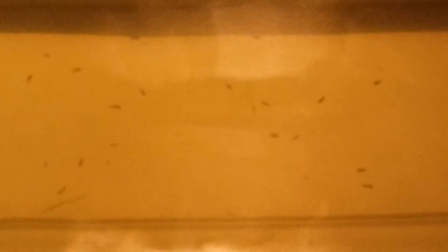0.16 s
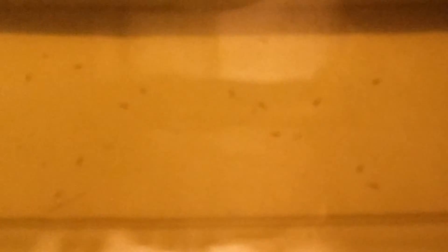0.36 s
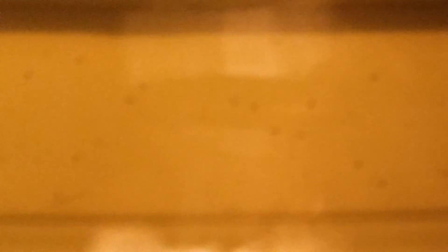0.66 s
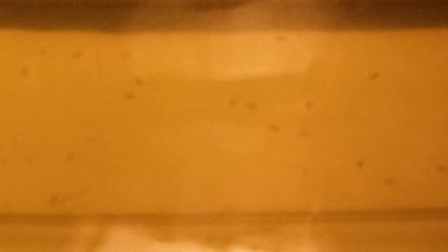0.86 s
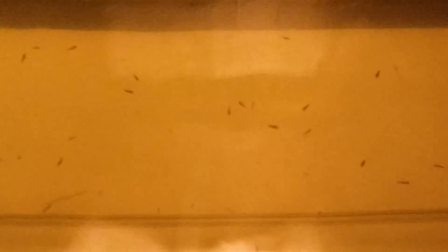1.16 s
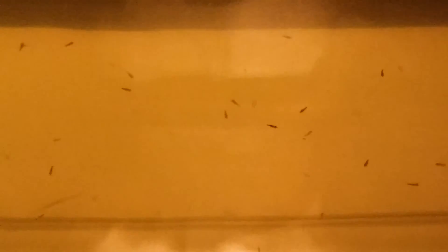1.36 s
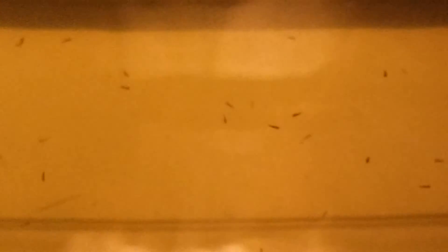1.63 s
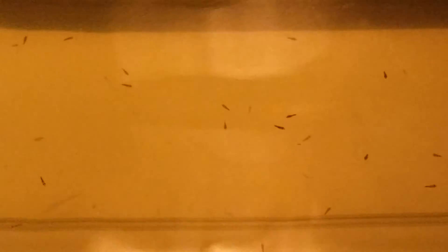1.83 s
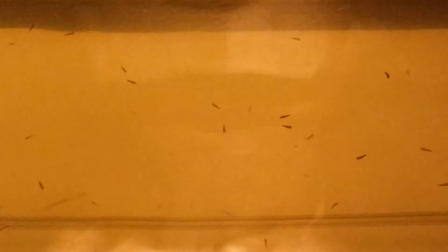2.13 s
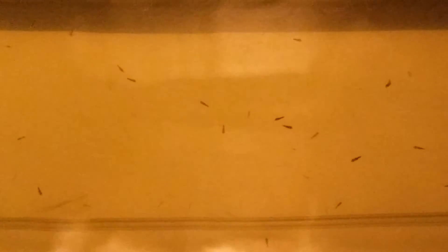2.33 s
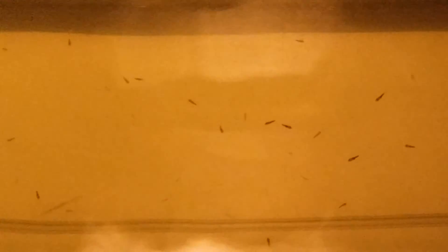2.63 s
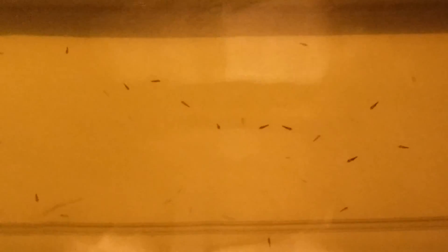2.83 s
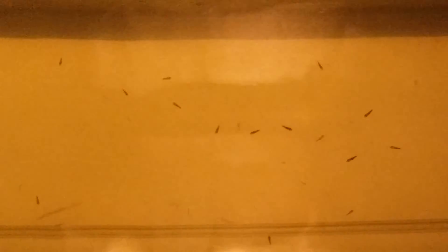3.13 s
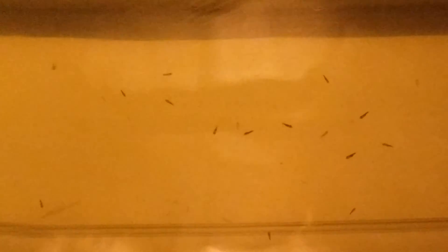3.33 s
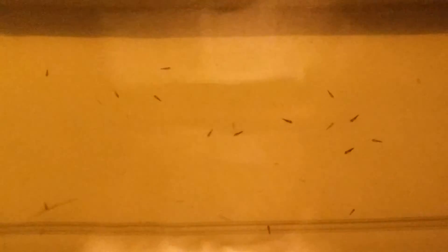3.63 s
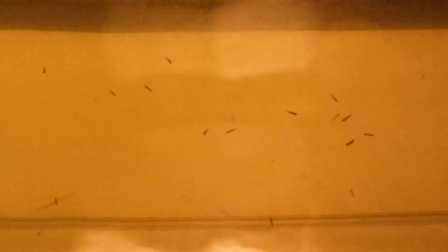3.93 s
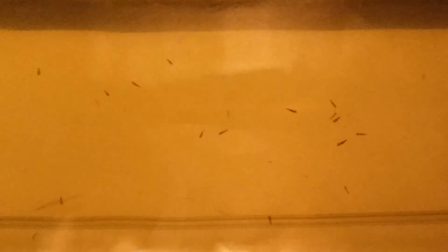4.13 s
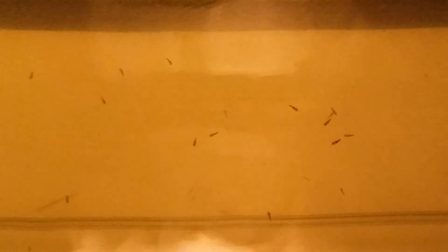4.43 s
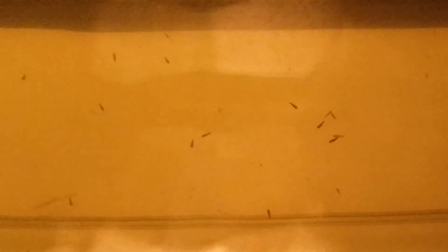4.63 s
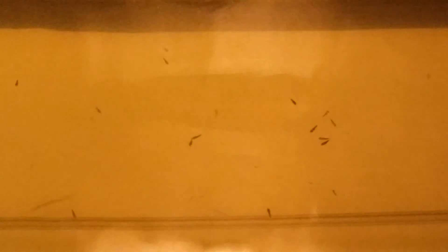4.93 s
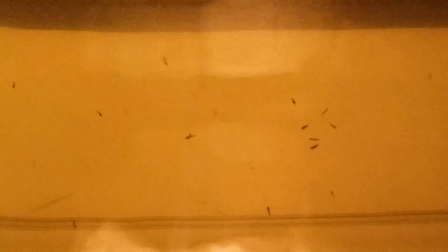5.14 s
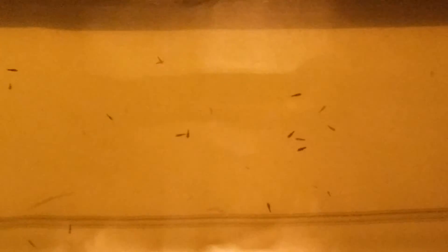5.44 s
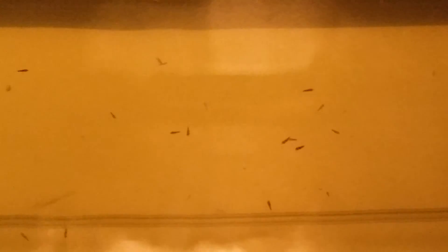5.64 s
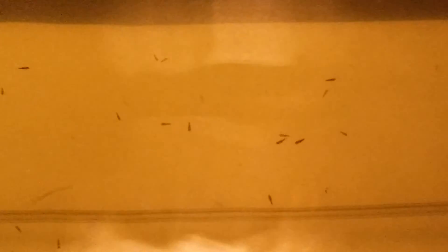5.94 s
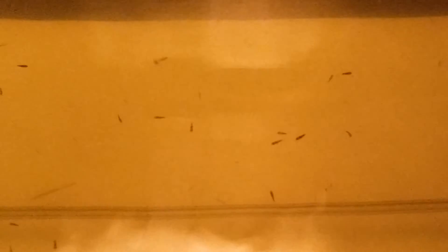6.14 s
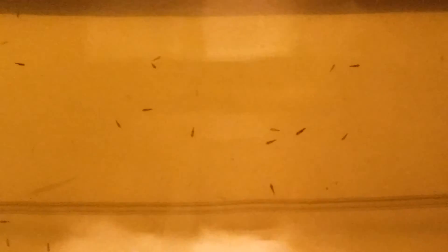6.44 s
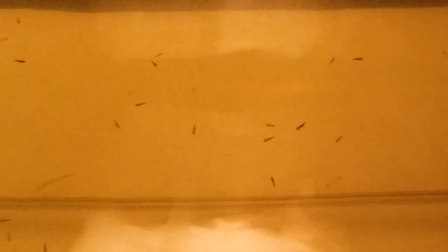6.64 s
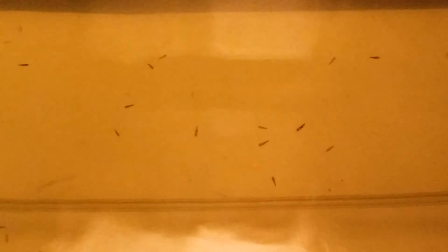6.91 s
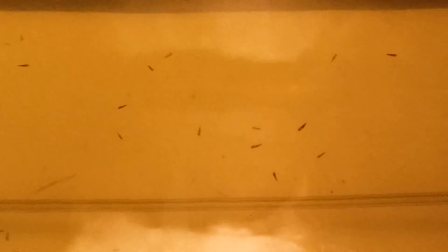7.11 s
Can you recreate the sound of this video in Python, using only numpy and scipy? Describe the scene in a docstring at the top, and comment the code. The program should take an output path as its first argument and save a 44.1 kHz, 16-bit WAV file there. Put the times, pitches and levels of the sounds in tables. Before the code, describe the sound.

An aquarium pump hums low and steadily with a fluttering, wavering drone, soft rushing water and hiss, and occasional tiny bubble ticks.

```python
"""An aquarium pump hums at multiples of the mains frequency; the level around 120 Hz wavers irregularly.
Resonances of the housing throb with the impeller, over steadier resonances of the pump and the tank.
Noise shaped in frequency makes the rumble, the rush of water and the hiss at the surface.
Bubbles burst there as short decaying rings with dense reflections. The sound fades in by two steps."""
import sys
import numpy as np
from scipy import signal
from scipy.fft import rfft, irfft
from scipy.io import wavfile
from scipy.ndimage import uniform_filter1d

SR = 44100
rng = np.random.default_rng(int(sys.argv[2]) if len(sys.argv) > 2 else 0)


def generate_wav(signal):
    """Clip the signal to [-1, 1] and save it as 16-bit WAV at the path in sys.argv[1]."""
    frames = np.transpose(np.atleast_2d(signal))
    scaled = np.clip(frames, -1, 1) * 32767
    pcm = np.round(scaled).astype(np.int16)
    wavfile.write(sys.argv[1], SR, pcm)


N = 320607
TIME = np.arange(N) / SR  # s
FREQS = np.fft.rfftfreq(N, 1 / SR)  # Hz

MAINS_HZ = 60.022
THROB_HZ, THROB_CREST_S = 15.545, 0.0066  # rate of the impeller's throb; time of one crest
BAND_EDGE_HZ = 14850
FADE_START_S, FADE_RISE_S, FADE_HOLD_DB = 0.042, 0.19, -5.5  # rises from silence, holds below full level
FULL_START_S, FULL_RISE_S = 0.62, 0.27  # then rises the rest of the way
HUM_RISE_S = 0.24  # the hum's own additional ramp


def from_db(db):
    """Amplitude ratio: 20 dB is a factor of ten."""
    return 10 ** (np.asarray(db) / 20)


def unit(x):
    """Normalization by root mean square: scales each channel to rms 1."""
    return x / np.sqrt(np.mean(x ** 2, axis=-1, keepdims=True) + 1e-20)


def ramp(start_s, rise_s):
    """Linear onset: rises evenly from 0 to 1 and stays there."""
    return np.clip((TIME - start_s) / rise_s, 0, 1)


def spectrum(rows):
    """Spectral envelope: each table column is joined by straight lines over log frequency."""
    hz, *columns = np.transpose(rows)
    log_freqs = np.log(FREQS + 1)
    return np.array([np.interp(log_freqs, np.log(hz + 1), column) for column in columns])


def drift(rate_hz):
    """Random modulation: Gaussian low-pass noise of zero mean and rms 1."""
    lowpass = np.exp(-(FREQS / rate_hz) ** 2) * (FREQS > 0)
    return unit(irfft(rfft(rng.standard_normal(N)) * lowpass, N))


def panned(sound, pan_db):
    """Level difference between channels: positive values favor the left."""
    return sound * from_db([[pan_db / 2], [-pan_db / 2]])


def add(mix, start_s, sound):
    """Superposition: a stereo sound is summed into the mix at its start time."""
    part = mix[:, max(round(start_s * SR), 0):][:, :sound.shape[1]]
    part += sound[:, :part.shape[1]]


# likeness of the two channels: (frequency [Hz], correlation [-1 to 1])
CHANNEL_CORRELATION = [(130, 0.92), (250, 0.95), (330, 0.82), (450, -0.11), (700, 0.92), (1000, 0.27),
                       (1600, -0.46), (2500, 0.34), (3300, -0.11), (6000, -0.023)]


def noise(gain):
    """Interchannel correlation: stereo noise of a given amplitude per root Hz, alike by frequency."""
    first, second = rfft(rng.standard_normal((2, N)))
    same = np.clip(spectrum(CHANNEL_CORRELATION)[0], -1, 1)
    right = same * first + np.sqrt(1 - same ** 2) * second
    return irfft(np.array([first, right]) * gain, N) * np.sqrt(SR / 2)


def ringing(hz, width):
    """Resonance: broadband turbulence excites a narrow band about one frequency."""
    return noise(1 / (1 + ((FREQS - hz) / width * 1.48) ** 2))


# Spectral densities before the flow modulates them.
# rumble of tank and stand: (frequency [Hz], level [dB per Hz])
RUMBLE_SPECTRUM = [(30, -87), (46, -73.5), (64, -58.5), (72, -59.5), (92, -57.5), (105, -61), (115, -48.5),
                   (128, -55), (146, -56), (164, -58.5), (185, -56), (208, -56.5), (240, -54.5),
                   (290, -54.5), (325, -59), (350, -67.5), (560, -112)]
# rush of water in the pump: (frequency [Hz], left level [dB per Hz], right level [dB per Hz])
RUSH_SPECTRUM = [(150, -105, -105), (329, -68.5, -81.5), (422, -63.5, -62), (540, -74.5, -71),
                 (634, -61, -64.5), (699, -64.5, -67.5), (747, -67.5, -70.5), (850, -71.5, -77),
                 (946, -72, -70), (1120, -73.5, -70), (1490, -72.5, -73), (1555, -72, -70),
                 (2290, -75.5, -70.5), (2340, -73.5, -67.5), (3290, -80, -72.5), (4500, -83.5, -86),
                 (9000, -115, -115)]
# hiss at the surface: (frequency [Hz], left level [dB per Hz], right level [dB per Hz])
HISS_SPECTRUM = [(1500, -115, -115), (2780, -79.5, -89), (4170, -76, -73), (4600, -75, -82),
                 (5240, -74.5, -76.5), (6820, -73, -83.5), (7600, -81.5, -76.5), (8420, -80.5, -78),
                 (10660, -94.5, -89.5), (10580, -79, -94.5), (12700, -117, -86), (16600, -99, -90.5)]


def water(rumble_db=-0.55, rush_db=0.5, hiss_db=0.82, churn_hz=16):
    """Flow noise: one uneven flow lifts rush and hiss together while the rumble sinks."""
    flow = drift(churn_hz)
    layers = [(RUMBLE_SPECTRUM, rumble_db), (RUSH_SPECTRUM, rush_db), (HISS_SPECTRUM, hiss_db)]
    out = np.zeros((2, N))
    for rows, depth_db in layers:
        out += noise(from_db(spectrum(rows))) * from_db(depth_db * flow)
    return out


def bubble(db, hz, pan_db, cycles, wet, echo_s, snap, crack=0.14, crack_s=0.00036):
    """Cavity resonance: the film cracks, the cavity rings, and glass, lid and water reflect it densely."""
    t = np.arange(SR // 8) / SR
    age = t * hz / cycles
    envelope = age * np.exp(1 - age)  # peaks at 1 after the given cycles
    # the ragged tear of the film spreads the ring over a wider band
    tear = unit(uniform_filter1d(rng.standard_normal(len(t)), size=8))
    phase = 2 * np.pi * hz * t
    ring = envelope * (np.sin(phase) + snap * tear * np.cos(phase))
    crack_noise = unit(np.diff(rng.standard_normal(len(t) + 1)))
    burst = ring + crack * crack_noise * np.exp(-t / crack_s)
    # the reflections build up over about 0.74 ms, then decay
    echo_envelope = np.exp(-t / echo_s) * (1 - np.exp(-t / 0.00074))
    echoes = unit(rng.standard_normal((2, len(t))) * echo_envelope) / np.sqrt(len(t))
    reflected = signal.fftconvolve(burst[None], echoes, axes=1)[:, :len(t)]
    return panned(from_db(db) * (burst + wet * reflected), pan_db)


# bubbles bursting at the surface: (time [s], peak level of the ring's envelope before panning [dB],
# pitch [Hz], left-right difference [dB], time until the ring peaks [cycles])
BUBBLE_BURSTS = [(1.1548, -31, 14300, -11, 3.5), (1.3504, -30, 6800, 5, 2.5), (1.734, -19, 13000, -10, 3.0),
                 (1.735, -21, 12400, -6, 3.6), (1.735, -22, 14400, -10, 3.3), (1.739, -29.5, 6250, 8, 3.6),
                 (1.9235, -32, 14400, -14, 4.2), (2.0284, -32, 5760, 7, 2.3),
                 (2.2847, -26.5, 14100, -13, 4.2), (2.4937, -27, 6760, 10, 2.2),
                 (2.6675, -29, 6790, 5, 2.3), (3.262, -23, 6300, 9, 1.6), (3.2645, -30, 7600, 6, 1.6),
                 (3.2924, -28, 13900, -11.5, 3.4), (3.785, -42, 14000, -14, 3.3),
                 (4.0006, -34, 5900, 5, 2.3), (4.1769, -31.5, 13800, -9.5, 3.2),
                 (4.3294, -30, 5240, 2.5, 2.1), (4.8132, -37, 14000, -9, 3.3),
                 (5.333, -36, 13800, -11, 3.3), (5.581, -28, 6050, 5, 2.3), (5.7206, -40, 14000, -12, 3.3),
                 (6.2564, -38, 14000, -14, 3.3), (6.572, -27, 6750, 7.5, 1.7), (6.595, -23, 5060, 6, 4),
                 (6.595, -25, 6200, 9, 1.6), (6.8249, -33, 14300, -8, 3.3)]


def bubbles(fizz_db=-46, fizz_pan_db=5, prickle_db=-51, prickle_pan_db=-12, spread_db=6, count=90):
    """Bubble acoustics: distinct bursts over random faint ones, the tiny ones pitched higher."""
    out = np.zeros((2, N))
    for start_s, db, hz, pan_db, cycles in BUBBLE_BURSTS:
        add(out, start_s, bubble(db, hz, pan_db, cycles, wet=1.0, echo_s=0.011, snap=0.29))
    # fizz of larger bubbles
    for when, pitch, strength in rng.random((count, 3)):
        db, hz = fizz_db + spread_db * strength ** 2, 4800 + 3700 * pitch
        add(out, when * N / SR, bubble(db, hz, fizz_pan_db, cycles=3.8, wet=2.5, echo_s=0.011, snap=0.51))
    # prickle of tiny bubbles
    for when, pitch, strength in rng.random((count // 2, 3)):
        db, hz = prickle_db + spread_db * strength ** 2, 13000 + 1600 * pitch
        add(out, when * N / SR, bubble(db, hz, prickle_pan_db, cycles=3.6, wet=1.3, echo_s=0.012, snap=0.88))
    return out


# low resonances of the tank: (frequency [Hz], width setting [Hz], level [dB rms])
TANK_MODES = [(97, 3, -47.5), (144.9, 2.1, -43), (325, 3, -49)]


def tank():
    """Modal resonance: the tank and its stand boom at a few low pitches."""
    return sum(unit(ringing(hz, width)) * from_db(db) for hz, width, db in TANK_MODES)


# high resonances of the pump, levels before the common lift:
# (frequency [Hz], width setting [Hz], left level [dB rms], right level [dB rms])
PUMP_MODES = [(1925, 16, -59, -62), (2432, 9, -60, -55), (2461, 10, -55, -54), (2505, 7, -60, -61),
              (2546, 6, -58, -58), (2570, 7, -60, -54), (2634, 10, -54, -53), (2700, 10, -59, -61),
              (2811, 18, -57, -50), (2889, 6, -64, -58), (2947, 10, -64, -57), (3104, 12, -63, -54),
              (3165, 12, -66, -60), (4067, 25, -60, -64), (4150, 30, -61, -66), (5702, 40, -60, -65)]


def buzz(lift_db=1.1):
    """Narrow-band resonance: stiff parts of the pump sound as a cluster of thin, wavering strands."""
    out = np.zeros((2, N))
    for hz, width, left_db, right_db in PUMP_MODES:
        out += unit(ringing(hz, width)) * from_db([[left_db], [right_db]])
    return from_db(lift_db) * out


# resonances of the housing: (frequency [Hz], width setting [Hz], left level [dB rms],
# right level [dB rms], throb depth [0-1], lag behind the throb [s])
HOUSING_MODES = [(453.4, 32, -51, -46, 0.32, -0.0066), (759, 5, -44.5, -53, 0.25, -0.0005),
                 (798, 24, -56.5, -48, 0.4, -.003), (906, 74, -56, -58.5, 0.4, -0.011),
                 (1048, 18, -43, -48, 0.49, 0.0024), (1112, 36, -73, -57.5, 0.4, 0.011),
                 (1327, 25, -61, -52, 0.13, -0.0032)]


def housing(sharpness=1.3, evenness=1.05, second_harmonic=0.08):
    """Amplitude modulation: resonances rubbed by the impeller swell once per beat."""
    out = np.zeros((2, N))
    for hz, width, left_db, right_db, depth, lag_s in HOUSING_MODES:
        turn = 2 * np.pi * THROB_HZ * (TIME - THROB_CREST_S - lag_s)
        beat = np.exp(sharpness * np.cos(turn) + second_harmonic * np.cos(2 * turn))
        depth = np.clip(depth, 0, 1)
        ring = ringing(hz, width)
        # a deeper throb also evens out more of the ring's random swelling
        strength = np.sqrt(abs(uniform_filter1d(ring ** 2, size=256)) + 1e-12)
        evened = ring / strength ** (evenness * np.sqrt(depth))
        rubbed = evened * (1 + depth * (beat - 1))
        out += unit(rubbed) * from_db([[left_db], [right_db]])
    return out


# motor hum before level changes and ramp:
# (multiple of the mains, level before panning [dB rms], left-right difference [dB])
HUM_HARMONICS = [(1, -51, -.5), (2, -33.5, -1), (3, -35, 0), (4, -39, 0), (5, -42.5, 3), (6, -53, -12.5),
                 (7, -68.5, 15), (9, -56.5, 2), (15, -64, 0)]
# irregular level around 120 Hz, as steady hum and nearby rumble noise beat by chance;
# before its mean is removed and its range scaled: (time [s], level [dB])
LEVEL_AROUND_120_HZ = [(0.2, -35), (0.65, -32.5), (0.82, -29), (0.93, -35.5), (1.15, -30), (1.36, -31.5),
                       (1.45, -41), (1.65, -30.5), (2.25, -30.5), (2.36, -32), (2.63, -35.5), (2.7, -40),
                       (2.77, -27.5), (3.08, -34.5), (3.19, -35), (3.3, -26), (3.49, -37), (3.57, -31),
                       (3.68, -47), (3.8, -26.5), (3.98, -32.5), (4.07, -42), (4.15, -34), (4.32, -33),
                       (4.4, -24), (4.53, -26.5), (4.6, -41), (4.68, -33), (4.79, -41), (4.89, -26),
                       (5.26, -47.5), (5.41, -30), (5.99, -33.5), (6.1, -24.5), (6.16, -47), (6.23, -32.5),
                       (6.54, -28.5), (6.68, -37), (6.77, -32.5), (6.93, -40), (7.0, -28.5), (7.25, -29.5)]


def motor(waver_db=1.0, waver_hz=1.65, smear=0.0249, beating_share=0.78):
    """Harmonic series: one kick per mains cycle, its bass lagging a little; every harmonic wavers."""
    beating_db = np.interp(TIME, *np.transpose(LEVEL_AROUND_120_HZ))
    beating_db = beating_share * (beating_db - beating_db.mean())
    out = np.zeros((2, N))
    for order, db, pan_db in HUM_HARMONICS:
        k = round(order)
        cycles = k * MAINS_HZ * TIME + smear * k ** 2
        harmonic = np.sqrt(2) * np.cos(2 * np.pi * cycles)
        # the chance beating is applied as a level curve to the second harmonic alone
        level_db = db + waver_db * drift(waver_hz) + beating_db * (k == 2)
        out += panned(harmonic * from_db(level_db), pan_db)
    return out * ramp(FADE_START_S, HUM_RISE_S)


def scene():
    """Superposition: the pressures of water, tank and pump add."""
    return water() + bubbles() + tank() + buzz() + housing() + motor()


def record(dry):
    """Gain and band limit: the sound fades in by two steps, then a low-pass filter cuts the top treble."""
    second_step = from_db(FADE_HOLD_DB * (1 - ramp(FULL_START_S, FULL_RISE_S)))
    fade = ramp(FADE_START_S, FADE_RISE_S) * second_step
    lowpass = signal.firwin(255, BAND_EDGE_HZ, window=("kaiser", 8), fs=SR)
    return signal.oaconvolve(dry * fade, lowpass[None], "same")


dry = scene()
out = record(dry)
generate_wav(out)
```